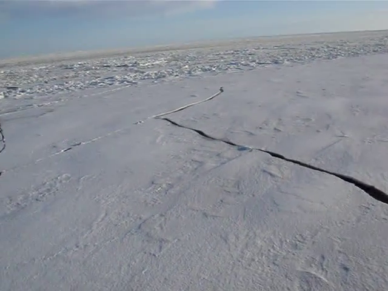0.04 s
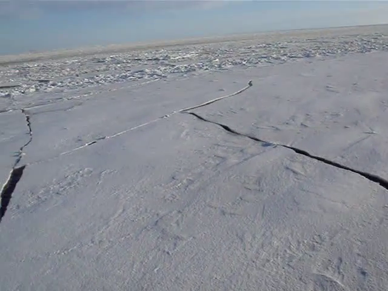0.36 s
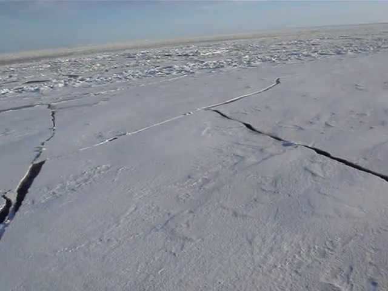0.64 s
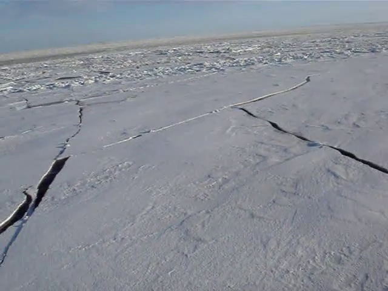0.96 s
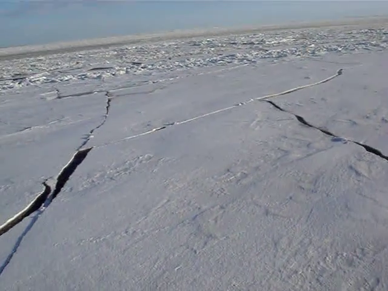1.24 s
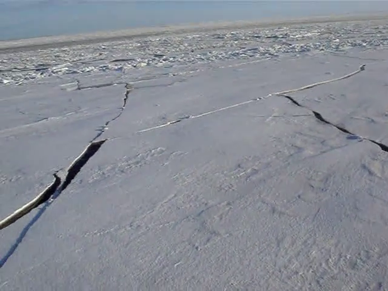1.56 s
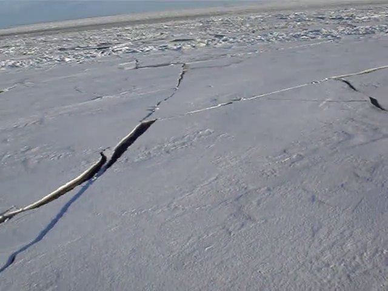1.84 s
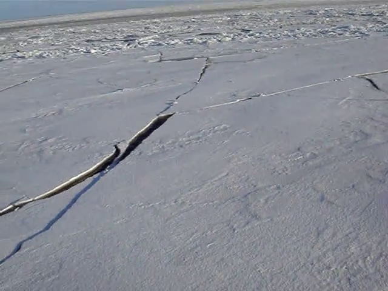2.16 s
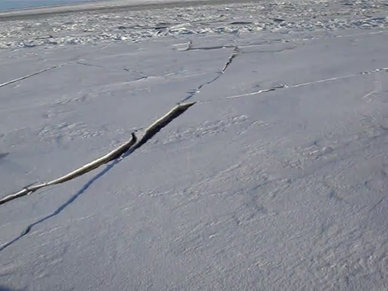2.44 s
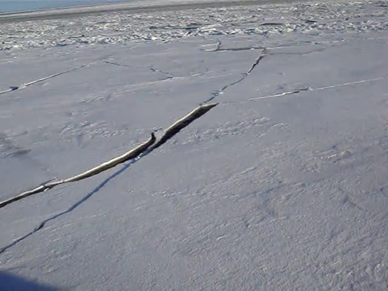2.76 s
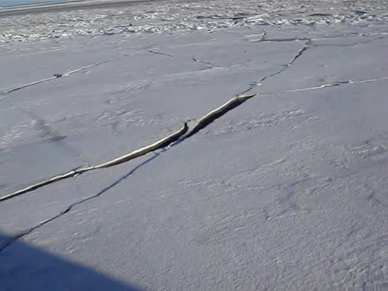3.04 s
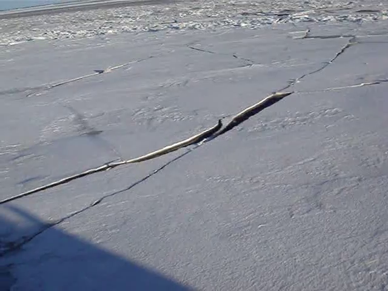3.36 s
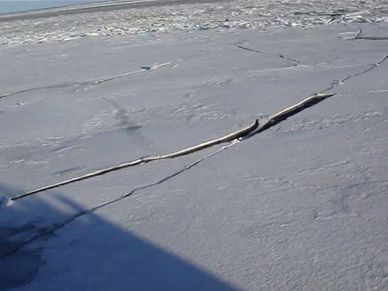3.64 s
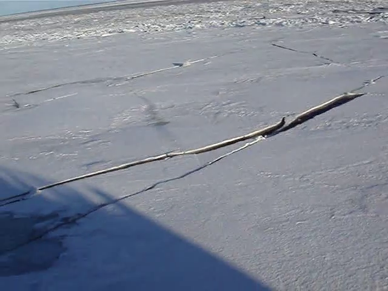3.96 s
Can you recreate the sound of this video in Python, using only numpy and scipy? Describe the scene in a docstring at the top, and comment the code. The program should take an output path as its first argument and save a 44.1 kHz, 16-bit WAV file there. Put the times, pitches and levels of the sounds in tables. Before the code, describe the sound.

Deep ship engine rumble with faint wind hiss and one short scrape of ice.

```python
"""A deep diesel throb fills the open deck of an icebreaker under way through sheet ice.
Exhaust tones beat in the funnel, uneven firing makes hull and deck boom, and fans whine
over a steady roar of ventilation and water. Wind and sliding ice hiss behind it all.
Once a slab scrapes along the hull in a gritty swish, with two small cracks,
and a floe grinds low after it."""
import sys
import numpy as np
from scipy import signal
from scipy.fft import rfft, irfft
from scipy.io import wavfile

SR = 44100
rng = np.random.default_rng(int(sys.argv[2]) if len(sys.argv) > 2 else 0)


def wav_out(sig):
    """Save sig, one row per channel (or a flat mono array), as 16-bit PCM at SR to the path in sys.argv[1]."""
    wavfile.write(sys.argv[1], SR, np.round(np.clip(np.atleast_2d(sig).T, -1, 1) * 32767).astype(np.int16))


N = 176400
CYCLE_HZ = 5.277  # the medium-speed diesel's working cycles a second


def from_db(db):
    """Decibels to gain."""
    return 10 ** (np.asarray(db) / 20)


def unit_rms(x):
    """Scale to an rms of 1."""
    return x / np.sqrt(np.mean(x ** 2) + 1e-20)


def seconds():
    """Time of every sample."""
    return np.arange(N) / SR


def fader_db(points):
    """Level ride in dB through (time, level) points."""
    return np.interp(seconds(), *np.transpose(points))


def drift(rate_hz):
    """Random modulation with an rms of 1, rolling off above rate_hz."""
    hz = np.arange(N // 2 + 1) * SR / N
    return unit_rms(irfft(rfft(rng.standard_normal(N)) * (hz > 0) / (1 + (hz / rate_hz) ** 2) ** 2, N))


def coloured(white, spectrum):
    """EQ unit white noise to a spectrum in dB per Hz."""
    hz, db = np.transpose(spectrum)
    bin_hz = np.maximum(np.arange(N // 2 + 1) * SR / N, 1)
    gain = from_db(np.interp(np.log(bin_hz), np.log(hz), db))
    return irfft(rfft(white) * gain, N) * np.sqrt(SR / 2)


def band(x, low_hz, high_hz):
    """Band-pass that is already ringing at the start."""
    sos = signal.butter(2, [low_hz, high_hz], "band", fs=SR, output="sos")
    return signal.sosfilt(sos, np.concatenate([x[-SR // 2:], x]))[-N:]


def swell(peak_s, hold_s, rise_db_per_s, fall_db_per_s):
    """Envelope that rises, holds at 1 around its peak and falls."""
    from_peak = seconds() - peak_s
    rise_db = rise_db_per_s * (from_peak + hold_s / 2)
    fall_db = -fall_db_per_s * (from_peak - hold_s / 2)
    return from_db(np.minimum(0, np.minimum(rise_db, fall_db)))


def tone(turns, db, waver_db=1.47):
    """A sine whose level wavers in the moving air."""
    gain = from_db(db + waver_db * drift(2.7))
    return np.sqrt(2) * gain * np.sin(2 * np.pi * (turns + rng.random()))


# Strong exhaust tones: (order [multiple of the engine cycle])
EXHAUST_ORDERS = (5, 8, 10, 20, 27, 30, 33, 35)
# Their balance, order by order: (level [dB])
EXHAUST_DB = (-35.5, -29.5, -37, -25, -30, -20.5, -21.5, -33.5)
def exhaust(cycles):
    """The diesel's strong orders sound through the funnel; their beating makes the throb."""
    return sum(tone(order * cycles, db) for order, db in zip(EXHAUST_ORDERS, EXHAUST_DB))


# Boom of funnel, hull and deck: (centre [Hz], width [Hz], level [dB])
HULL_RESONANCES = [(48, 13, -36.5), (80.2, 18, -29), (108.4, 13.3, -22.5), (153.2, 27, -24.5),
                   (168.6, 23.5, -16.5), (183.5, 5.1, -26.5), (257.6, 40.5, -26), (412, 16, -38),
                   (456, 35, -32), (535, 30, -32.5), (689.7, 39, -30.5), (753, 81, -33)]
def hull(cycles, firing_db=-7):
    """Uneven firing, alike in every engine cycle, and turbulence drive the ship's resonances."""
    size = int(SR / CYCLE_HZ)
    flat_spectrum = np.exp(2j * np.pi * rng.random(size // 2 + 1))
    one_cycle = unit_rms(irfft(flat_spectrum, size))
    firing = from_db(firing_db) * one_cycle[(cycles * size).astype(int) % size]
    boom = 0
    for hz, width, db in HULL_RESONANCES:
        drive = np.roll(firing, rng.integers(size)) + rng.standard_normal(N)
        boom += from_db(db) * unit_rms(band(drive, hz - width / 2, hz + width / 2))
    return boom


# Bass-heavy body of the roar: (frequency [Hz], density [dB per Hz])
ROAR_SPECTRUM = [(15, -62.5), (35, -46.5), (70, -44.5), (130, -41.5), (220, -46.5), (300, -45), (390, -50),
                 (620, -53), (900, -54.5), (1300, -59.5), (2000, -67.5), (4000, -76.5), (10000, -100)]
# Fader ride on the roar: (time [s], level [dB])
ROAR_RIDE = [(0, 1.1), (.7, 1.5), (1.4, 0.4), (1.9, -0.7), (2.6, -.5), (3.1, 0), (3.7, 1), (4, 1)]
def roar(flutter_db=0.84):
    """Ventilation and water along the hull make a broad, fluttering rush."""
    rush = coloured(rng.standard_normal(N), ROAR_SPECTRUM)
    return rush * from_db(fader_db(ROAR_RIDE) + flutter_db * drift(44))


# Hums and whines: (pitch [Hz], level [dB], pitch wander [Hz])
MACHINE_HUMS = [(43.4, -32, .15), (118.5, -33.5, .3), (177.2, -26, 0.29), (415.4, -37, 2.0),
                (512.5, -39, 2.5), (785, -36, 1.8), (1373, -48.5, 0.23)]
def machines():
    """Auxiliary machinery hums and fans whine, each slightly unsteady in pitch."""
    return sum(tone(np.cumsum(hz + wander * drift(4.9)) / SR, db) for hz, db, wander in MACHINE_HUMS)


# Fader ride on the loudest fan: (time [s], level [dB])
FAN_RIDE = [(0, -29), (1.2, -32), (1.6, -27), (2.0, -27), (2.4, -32.5), (2.75, -27), (3.2, -34.5), (4, -32)]
def fan(pitch_hz=535.6, wander_hz=2.085):
    """The loudest fan's whine comes and goes on the wind."""
    turns = np.cumsum(pitch_hz + wander_hz * drift(6.7)) / SR
    return tone(turns, fader_db(FAN_RIDE))


# Bright colour of the scrape at its height: (frequency [Hz], density [dB per Hz])
SCRAPE_SPECTRUM = [(700, -81.5), (1500, -70), (2200, -63), (2800, -69.5), (3500, -62.5), (4100, -68),
                   (4700, -68), (6200, -75.5), (7800, -73.5), (9000, -84), (10000, -90)]
def slab_scrape(grains_per_s=1300, spread_db=3.0, grit_share=0.55, judder_db=1.14):
    """A slab judders along the hull: a swell of tiny crushed grains over a smooth swish."""
    sizes = from_db(spread_db * np.minimum(rng.exponential(1, N), 4))
    signs = rng.choice([-1, 1], N)
    grit = unit_rms(sizes * signs * (rng.random(N) < grains_per_s / SR))
    swish = rng.standard_normal(N)
    friction = coloured(np.sqrt(grit_share) * grit + np.sqrt(1 - grit_share) * swish, SCRAPE_SPECTRUM)
    pressure = swell(peak_s=2.682, hold_s=0.07, rise_db_per_s=61.5, fall_db_per_s=103)
    return pressure * from_db(judder_db * drift(80)) * friction


# Small snaps in the ice: (time [s], level [dB], top of the band [Hz])
CRACK_HITS = [(2.583, -24, 7000), (2.956, -26.5, 5150)]
def ice_cracks(decay_s=0.0072, low_hz=2300):
    """The ice cracks in short, bright bursts that die at once."""
    t, snaps = seconds(), 0
    for start_s, db, top_hz in CRACK_HITS:
        burst = band(rng.standard_normal(N), low_hz, top_hz)
        burst = unit_rms(band(burst, low_hz, top_hz))  # second pass for steeper edges
        envelope = (t >= start_s) * np.exp(-np.abs(t - start_s) / decay_s)
        snaps += from_db(db) * envelope * burst
    return snaps


# Dark colour of the grind at its height: (frequency [Hz], density [dB per Hz])
GRIND_SPECTRUM = [(130, -64), (230, -42), (300, -44), (370, -44), (450, -52.5), (700, -57), (1500, -95)]
def floe_grind():
    """A floe presses on the hull with a dull, rough swell."""
    pressure = swell(peak_s=3.56, hold_s=0.089, rise_db_per_s=14, fall_db_per_s=42)
    return pressure * coloured(rng.standard_normal(N), GRIND_SPECTRUM)


# Airy bed of wind and ice: (frequency [Hz], density [dB per Hz])
HISS_SPECTRUM = [(500, -80.5), (1200, -67.5), (2000, -65.5), (3000, -69.5), (3800, -72.5), (4300, -75),
                 (5200, -75), (7000, -80), (8500, -84.5), (10000, -93.5)]
# Fader ride on the hiss: (time [s], level [dB])
HISS_RIDE = [(0, 2.2), (.3, 0.3), (.55, 0.5), (.85, 0.5), (1.15, -2), (1.55, 0.3), (1.75, -1), (2.05, 1.1),
             (2.35, -1.2), (2.7, 1.5), (3.05, -1), (3.35, 0), (3.55, -.4), (3.82, 1.8), (4, -2)]
def hiss(flutter_db=1.12):
    """Wind and ice slide past, swelling gently."""
    bed = coloured(rng.standard_normal(N), HISS_SPECTRUM)
    return bed * from_db(fader_db(HISS_RIDE) + flutter_db * drift(37))


def scene():
    """Ship and ice in mono, heard from the rail; one engine drives both exhaust and hull."""
    engine_hz = CYCLE_HZ * (1 + 0.00041 * drift(1.8))  # the speed wanders a hair
    cycles = np.cumsum(engine_hz) / SR
    ship = exhaust(cycles) + machines() + fan() + hull(cycles) + roar()
    return (ship + hiss() + slab_scrape() + ice_cracks() + floe_grind())[None]


def record(dry, cutoff_hz=10050):
    """A soft clip rounds the highest peaks and a steep low-pass cuts the top."""
    rounded = dry / (1 + dry ** 8) ** (1 / 8)
    return signal.sosfilt(signal.ellip(12, 0.1, 90, cutoff_hz, fs=SR, output="sos"), rounded)


dry = scene()
out = record(dry)
wav_out(out)
```